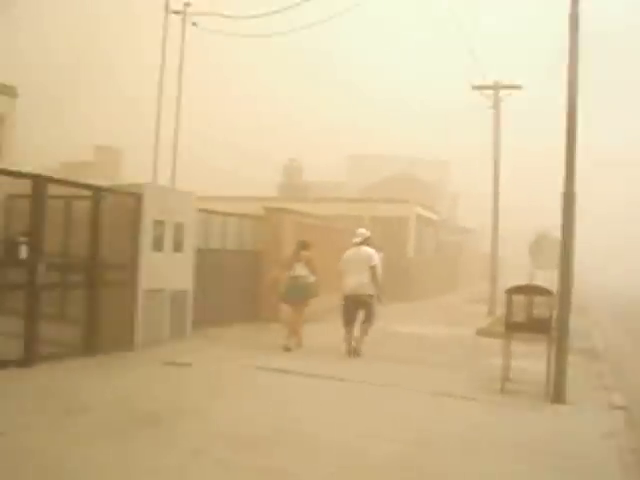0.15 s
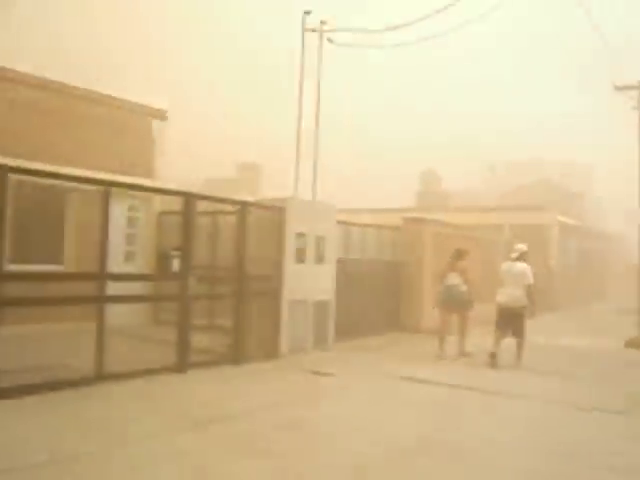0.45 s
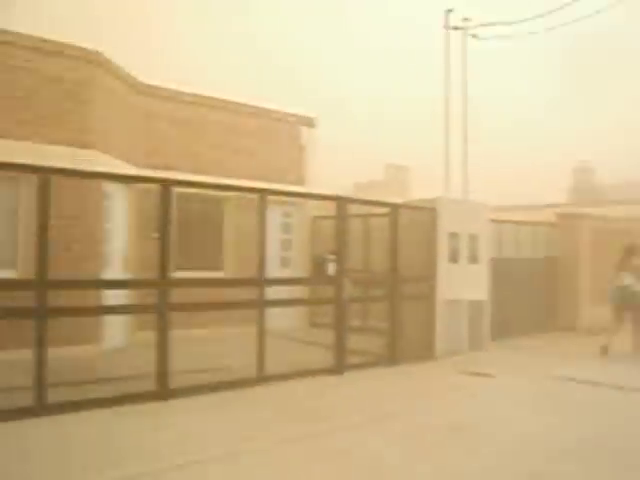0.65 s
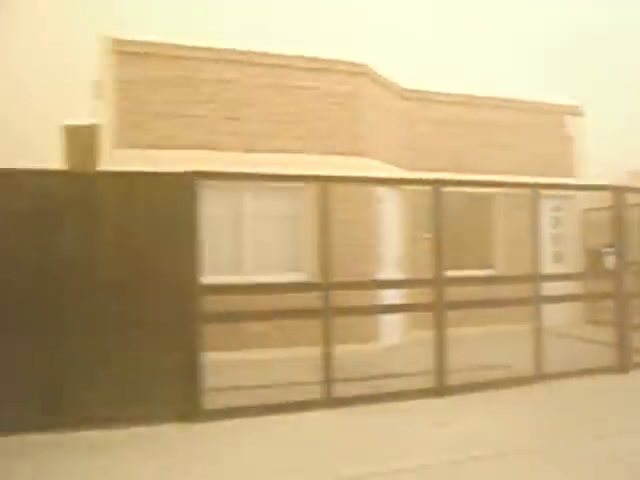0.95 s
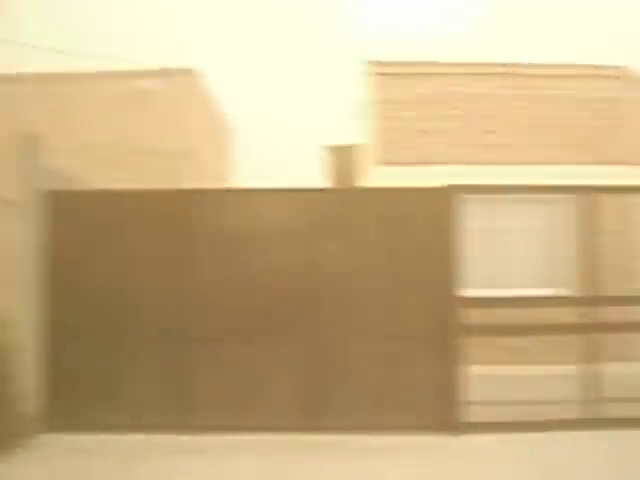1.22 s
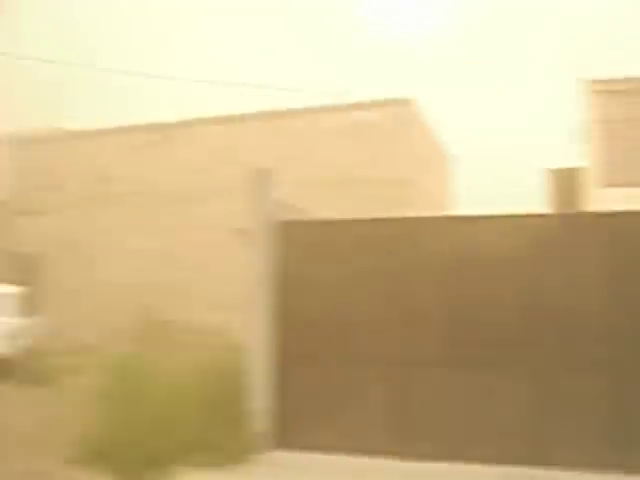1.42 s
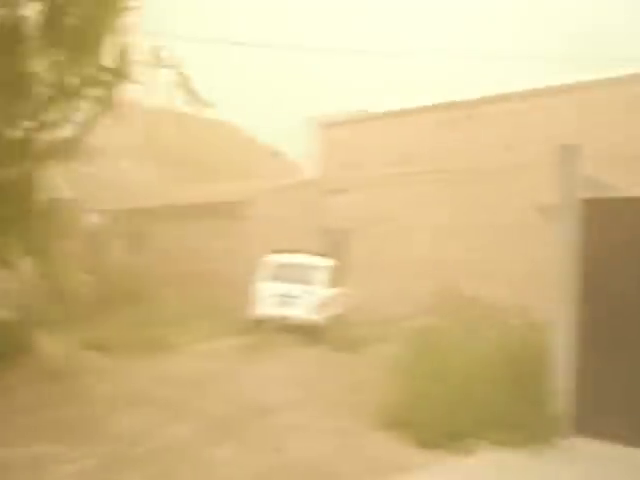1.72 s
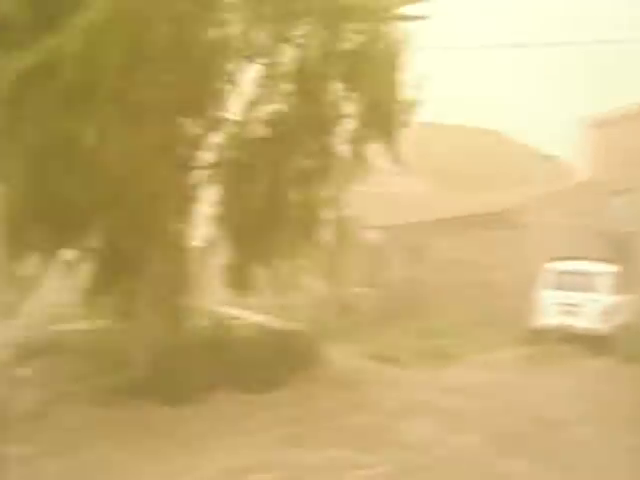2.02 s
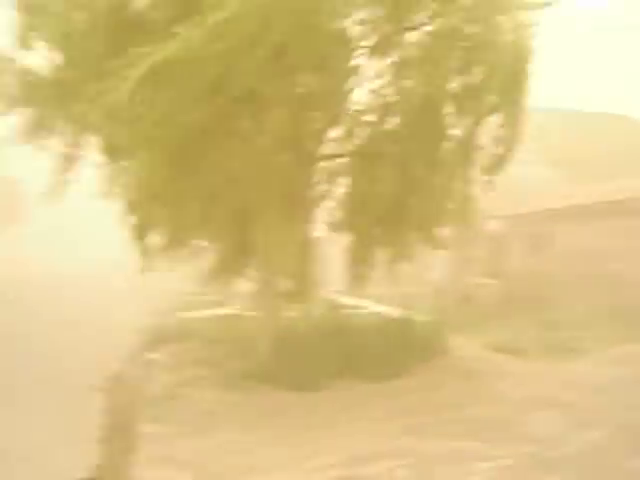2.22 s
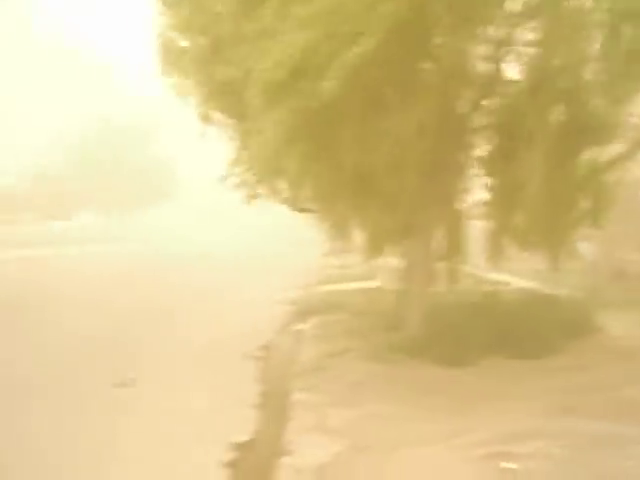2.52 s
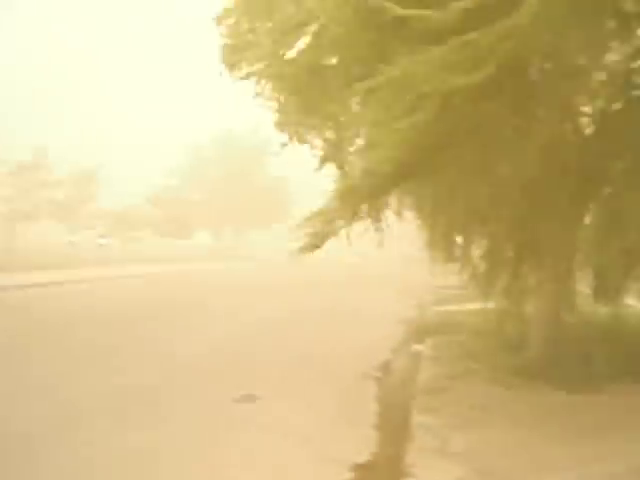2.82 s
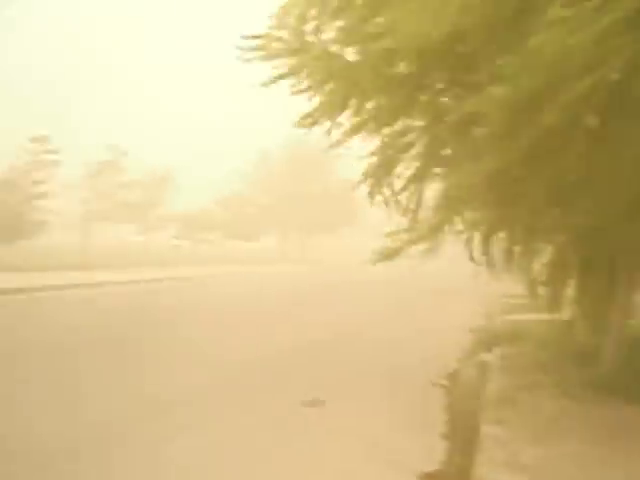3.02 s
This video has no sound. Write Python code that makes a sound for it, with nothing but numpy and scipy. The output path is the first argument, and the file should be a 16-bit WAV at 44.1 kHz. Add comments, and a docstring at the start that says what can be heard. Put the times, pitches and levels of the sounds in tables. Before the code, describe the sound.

Wind buffets a small microphone on a street with a low, fluttering rumble. Short gusts hit at about 0.1 and 0.6 seconds, then it eases. The strongest gust comes from 1.4 to 1.9 seconds, overloading into harsh crackle. After a brief dip, another crackling blast hits around 2.3 to 2.6 seconds, followed by weaker buffeting until about 3 seconds. A faint, steady wind hiss continues behind it.

```python
"""Storm wind on a dusty street

Gusts hit the microphone of a small hand-held camera, in mono. Right at the port, eddies make a rumble
that grows louder and brighter with each gust; further off, the wind rushes steadily along the street.
The recorder passes only a narrow band and overloads in strong gusts, turning rumble into harsh crackle."""
import sys
import numpy as np
from scipy import signal
from scipy.fft import rfft, irfft
from scipy.io import wavfile
from scipy.ndimage import uniform_filter1d, map_coordinates

SR = 44100
rng = np.random.default_rng(int(sys.argv[2]) if len(sys.argv) > 2 else 0)


def unload_audio(sound):
    """Save the sound as a 16-bit wav file, at the path given as the first command line argument."""
    columns = np.transpose(np.atleast_2d(sound))
    # keep every value between -1 and 1, then stretch to whole-number steps
    steps = np.round(np.clip(columns, -1, 1) * 32767)
    wavfile.write(sys.argv[1], SR, steps.astype(np.int16))


N = 138915


def buffeting():
    """Eddies sweep over the microphone port: faster flow raises their pitch, gusts their pressure."""
    # wind pressure on the microphone: t/s, level/dB
    gusts = [(0, -28.5), (.085, -20), (.115, -4.5), (.16, -3), (.185, -12.5), (.22, -3.5), (.28, -6.5),
             (.3, -22), (.33, -12.5), (.39, -11), (.54, -9), (.57, 1), (.665, 1), (.69, -9), (.745, -13.5),
             (.78, -7), (.86, -8), (.92, -13), (1.01, -17), (1.09, -18.5), (1.18, -12), (1.23, -17),
             (1.32, -21), (1.39, -11.5), (1.42, 6.5), (1.58, 12), (1.605, 9), (1.72, -3.5), (1.82, 0),
             (1.84, -14), (1.9, 0), (1.98, -21.5), (2.05, -11), (2.13, -15.5), (2.2, -16.5), (2.26, -6.5),
             (2.32, 0.5), (2.355, -17), (2.41, 10.5), (2.46, 2), (2.56, -0.5), (2.595, -17), (2.67, -5.5),
             (2.75, -9.5), (2.82, -15), (2.93, -15), (2.99, -27), (3.07, -11.5), (3.15, -23)]
    # knee of the rumble, higher when the eddies pass faster: t/s, f/Hz
    knee = [(0, 224), (.065, 191.6), (.13, 360.5), (.28, 230.3), (.39, 159.5), (.6, 165.8), (.85, 180.4),
            (.94, 125.6), (1.07, 170.3), (1.38, 179.9), (1.5, 292.2), (1.79, 268.9), (1.89, 150.8),
            (2.0, 209.3), (2.3, 169.6), (2.55, 250.7), (2.75, 181.1), (2.92, 171), (3.15, 240.7)]
    # spectral density of the eddies with the knee at ref_knee_hz: f/Hz, level/dB
    eddy_spectrum = [(15, -0.5), (50, 1), (110, -0.5), (190, -1), (300, -8), (500, -15.5), (900, -33),
                     (1800, -50.5), (4000, -66)]
    ref_knee_hz, port_highpass_hz, steady_s, trim_db = 200, 32.4, .014, -0.5
    flutter_db, flutter_octaves = 1.85, .22
    flutter = walk(per_s=150)  # quick swings inside a gust
    slap_db, slap_octaves = slaps()
    pressure_db = curve(gusts) + slap_db + flutter_db * flutter
    speed = curve(knee) / ref_knee_hz * 2 ** (slap_octaves + flutter_octaves * flutter)
    pattern = noise(eddy_spectrum, size=2 * N)
    eddies = map_coordinates(pattern, [np.cumsum(speed)], order=3, mode="mirror")
    port = signal.butter(2, port_highpass_hz, "high", fs=SR, output="sos")
    rumble = signal.sosfilt(port, eddies)
    # even out the rumble so that the pressure sets its level
    rumble /= np.sqrt(uniform_filter1d(rumble ** 2, int(steady_s * SR)))
    return rumble * undb(trim_db + pressure_db) + tearing(pressure_db)


def slaps():
    """Large eddies slap the port, hold and die away; gives the shifts of pressure and knee over time."""
    # single large eddies: t/s, pressure shift/dB, length/s, knee shift/octaves
    large_eddies = [(0.117, 0, 0.016, 0.046), (0.134, -5.5, 0.0054, 0.44), (0.229, 13, 0.013, 0.54),
                    (0.261, 1, 0.015, 0.42), (0.35, 2.5, 0.014, 0.75), (.413, 6, .015, 0.52),
                    (0.482, -1, 0.011, .6), (0.624, 5.5, 0.0058, .8), (.639, 4, .01, .8),
                    (0.659, 4, .01, 0.52), (0.783, 0.5, 0.01, 0.53), (.88, 5, 0.015, 0.64),
                    (1.048, 6, 0.013, 0.55), (1.102, 7.5, .022, 0.63), (1.154, 6, .018, 0.58),
                    (1.352, 8, 0.011, .2), (1.4, -1.5, 0.016, 0.56), (1.44, 4, 0.011, 0.54),
                    (1.496, -1, .012, 0.35), (1.519, -2, .012, 0.34), (1.564, 14.5, .022, 0.32),
                    (1.645, 5, .005, 0.57), (1.666, 9, .012, .4), (1.702, 10.5, 0.013, .4),
                    (1.752, 12.5, 0.027, .6), (1.814, 4, .008, 0.42), (1.856, 1, .012, 0.75),
                    (1.932, 5.5, 0.013, 0.62), (2, 10, 0.014, 0.63), (2.052, 4.5, .01, -.3),
                    (2.146, 10, .012, 1.13), (2.173, 3.5, .012, 0.99), (2.209, 13, 0.02, .4),
                    (2.282, 1, .012, .5), (2.413, 9.5, .02, 0.77), (2.498, 11.5, 0.021, 0.45),
                    (2.525, -3, 0.0044, 0.64), (2.569, 12, 0.0079, 0.51), (2.616, 14.5, 0.017, .3),
                    (2.698, 5, 0.027, 0.22), (2.768, 10, 0.012, .1), (2.832, 2.5, 0.019, 0.57),
                    (2.893, 2, 0.019, 0.26), (2.961, 8.5, 0.014, 0.51), (3.012, 7, 0.0098, 0.36)]
    attack_s, release_s = .0022, .006
    t = np.arange(N) / SR
    slap_db, slap_octaves = np.zeros(N), np.zeros(N)
    for start, db, length, octaves in large_eddies:
        attack = np.clip((t - start) / attack_s + 1, 0, 1)
        release = np.exp(-np.maximum(t - start - length, 0) / release_s)
        slap_db += db * attack * release
        slap_octaves += octaves * attack * release
    return slap_db, slap_octaves


def tearing(pressure_db):
    """In strong flow, tiny eddies tear off the edge of the port in very short, uneven spurts."""
    # spectral density of the tiny eddies: f/Hz, level/dB
    tear_spectrum = [(100, -9), (500, 5), (1000, 4.5), (2000, -8), (3000, -14), (4500, -3.5)]
    base_db, spread_db, growth = -27, 11.5, 1.5  # growth: dB gained per dB of pressure
    hiss = noise(tear_spectrum, size=N)
    return hiss * undb(base_db + growth * pressure_db + spread_db * walk(per_s=600))


def street_rush():
    """Well back from the microphone, wind hisses smoothly through trees and fences."""
    # spectral density of wind and dust along the street: f/Hz, level/dB
    rush_spectrum = [(100, 1.5), (300, -13.5), (600, -3.5), (1000, -10.5), (1500, -15), (2200, -15.5),
                     (3200, -22), (4200, -14)]
    # slow course of the rush: t/s, level/dB
    rush_level = [(0, -26), (.7, -25), (1.3, -24), (1.8, -25.5), (2.1, -28.5), (2.7, -29), (2.85, -31.5),
                  (3.15, -30.5)]
    waver_db = -1.47
    return noise(rush_spectrum, size=N) * undb(curve(rush_level) + waver_db * walk(per_s=3.1))


def undb(db):
    """Decibels to gain."""
    return 10 ** (np.asarray(db) / 20)


def curve(rows):
    """Straight lines in time through rows of t/s, value."""
    return np.interp(np.arange(N) / SR, *np.array(rows).T)


def noise(spectrum, size):
    """Noise of rms 1, shaped by rows of f/Hz, level/dB."""
    hz, db = np.array(spectrum).T
    f = np.maximum(np.fft.rfftfreq(size, 1 / SR), 1)
    gain = undb(np.interp(np.log(f), np.log(hz), db))
    x = irfft(rfft(rng.standard_normal(size)) * gain, size)
    return x / x.std()


def walk(per_s):
    """Smooth motion of spread 1 through `per_s` random values a second."""
    x = map_coordinates(rng.standard_normal(2048), [np.arange(N) / SR * per_s], mode="mirror")
    return x / x.std()


def scene():
    """Wind right on the microphone, with the street behind it, in mono."""
    return (buffeting() + street_rush())[None]


def record(dry):
    """The camera's input overloads, the band is narrowed, and the ringing peaks are cut flat again."""
    input_ceiling, output_ceiling = .71, .705
    band_hz, top_hz = 3760, 15800
    overloaded = np.clip(dry[0], -input_ceiling, input_ceiling)
    band = signal.firwin(161, band_hz, window="blackman", fs=SR)
    padded = np.pad(overloaded, len(band) // 2, mode="edge")
    narrow = np.convolve(padded, band, "valid")
    flat = np.clip(narrow, -output_ceiling, output_ceiling)
    top_cut = signal.ellip(8, .1, 70, top_hz, fs=SR, output="sos")
    return signal.sosfilt(top_cut, flat)[None]


dry = scene()
out = record(dry)
unload_audio(out)
```